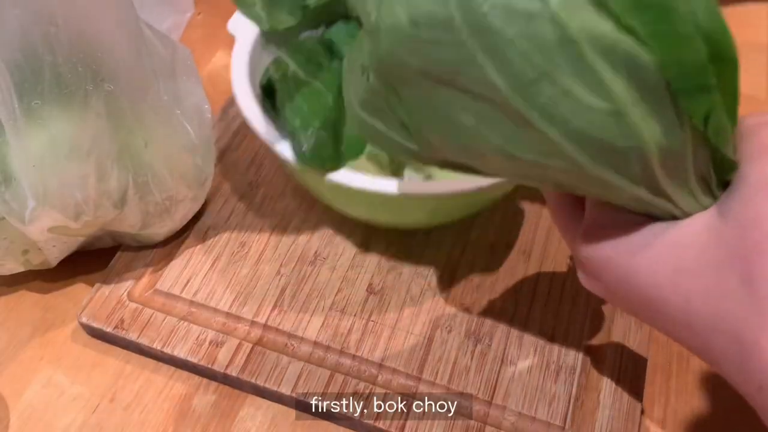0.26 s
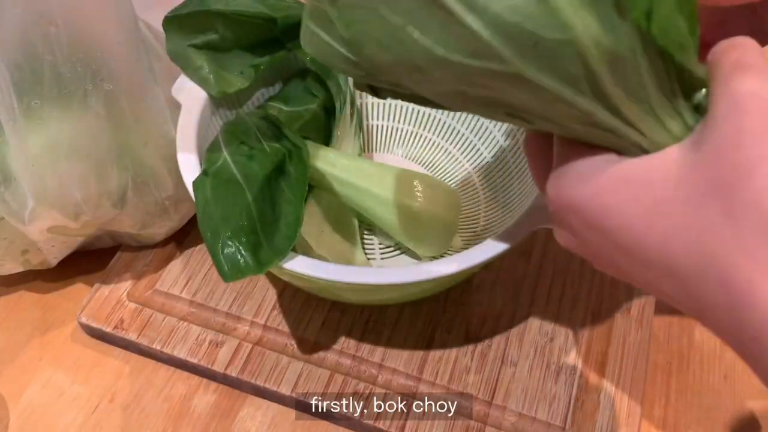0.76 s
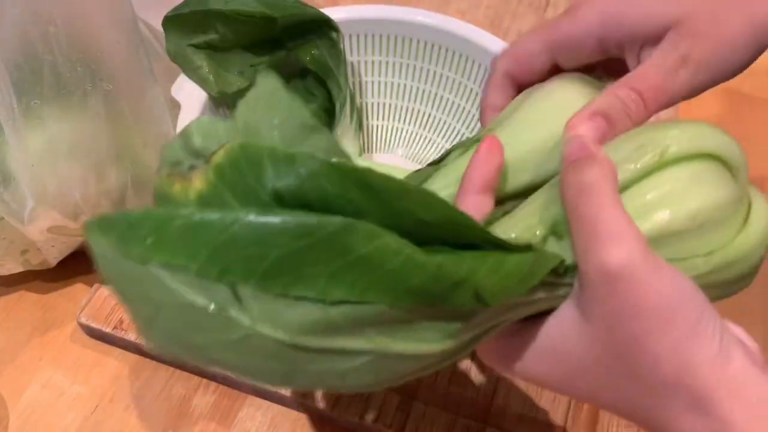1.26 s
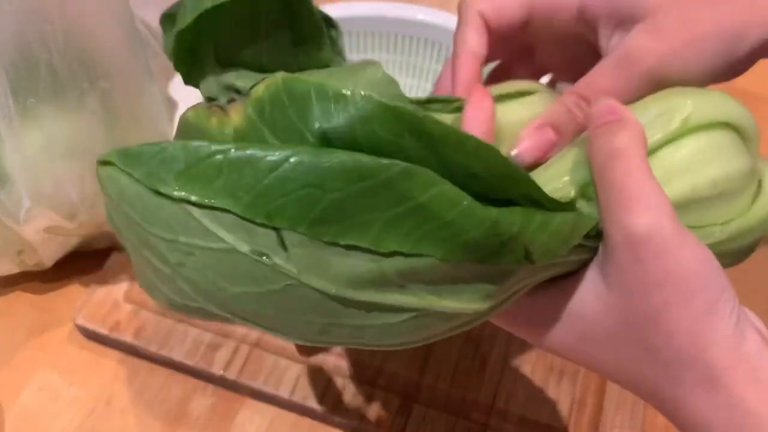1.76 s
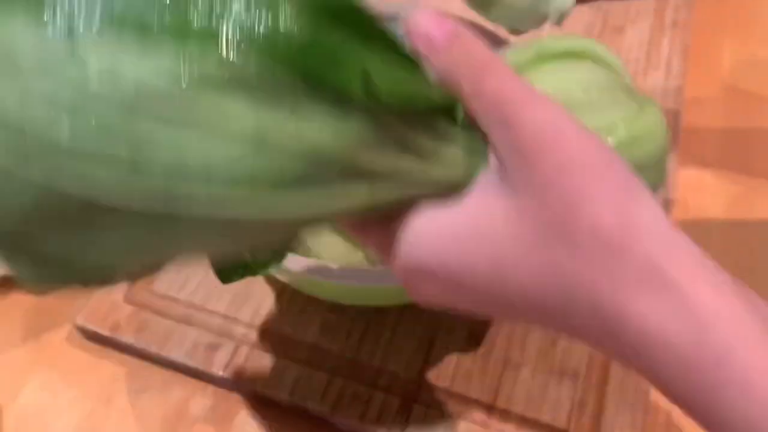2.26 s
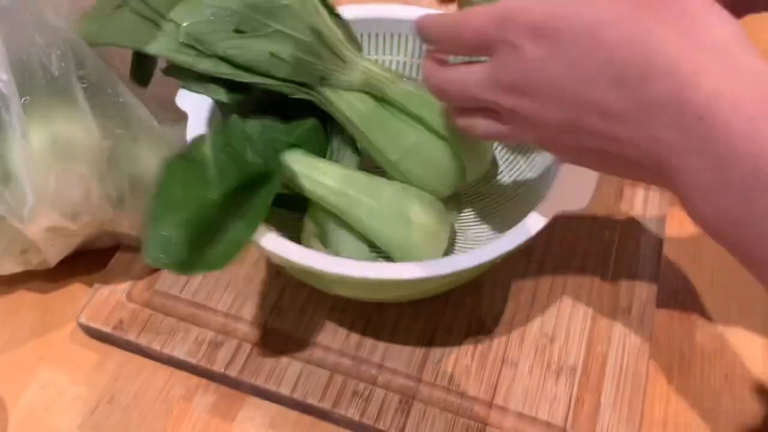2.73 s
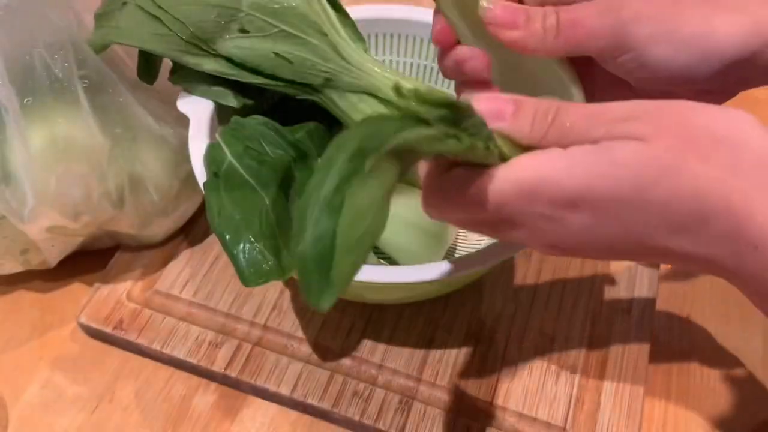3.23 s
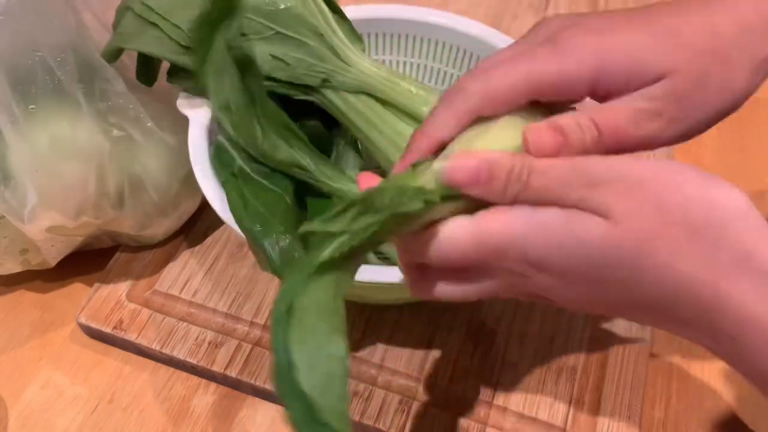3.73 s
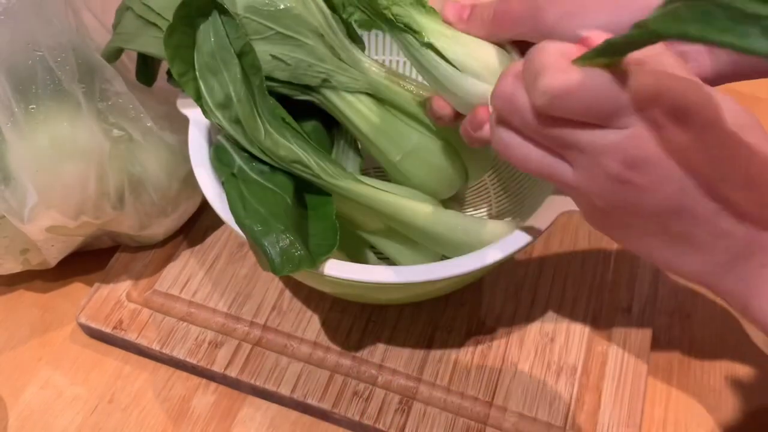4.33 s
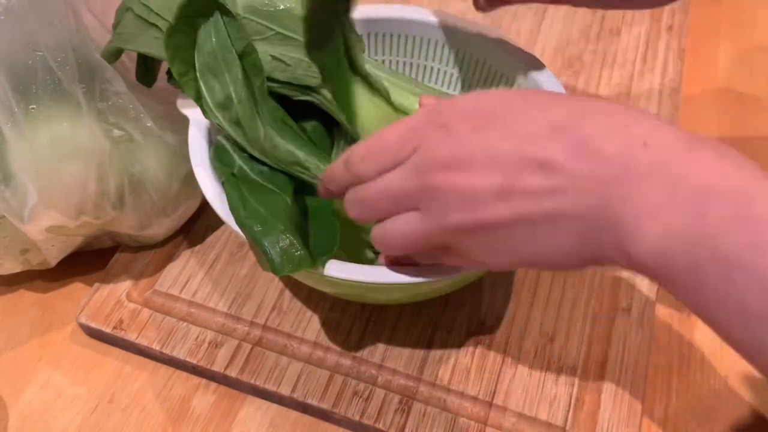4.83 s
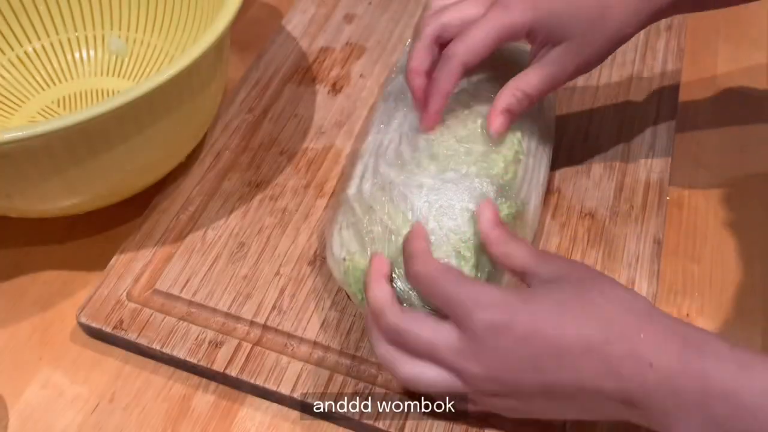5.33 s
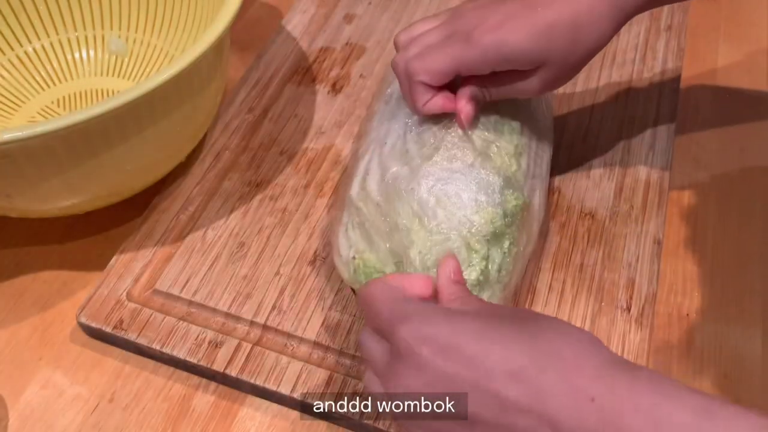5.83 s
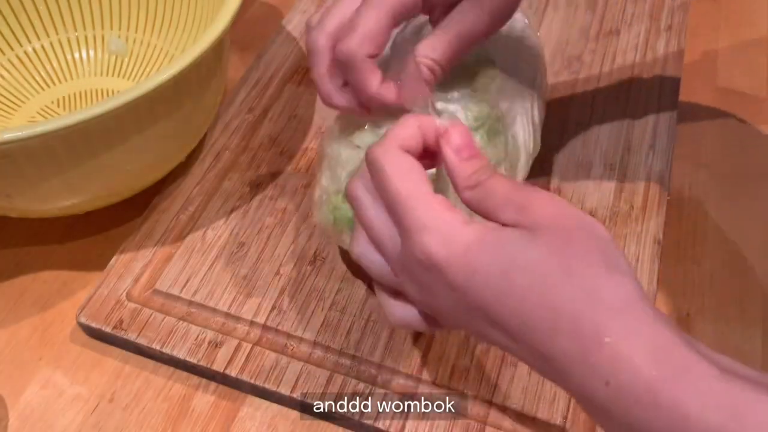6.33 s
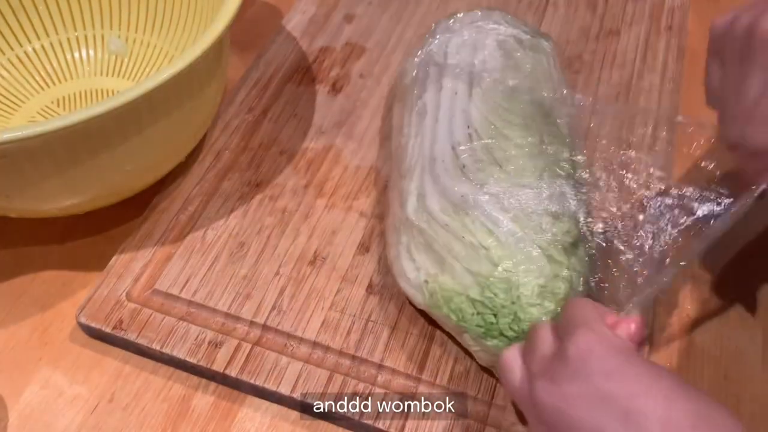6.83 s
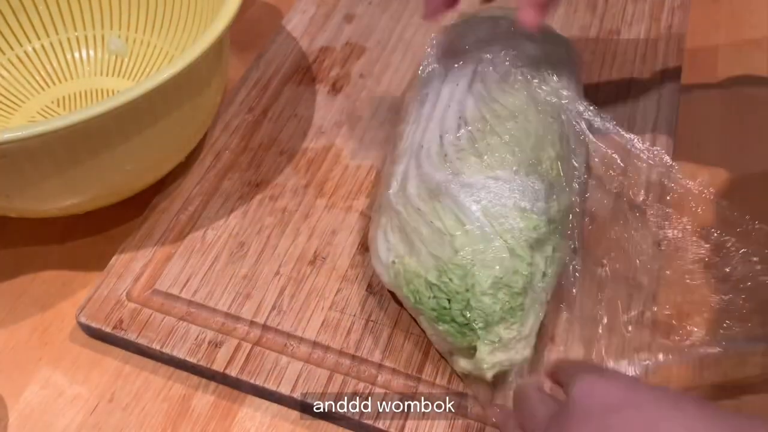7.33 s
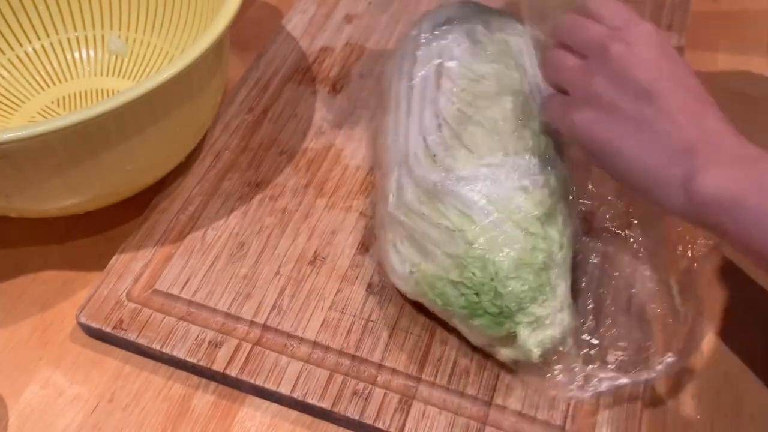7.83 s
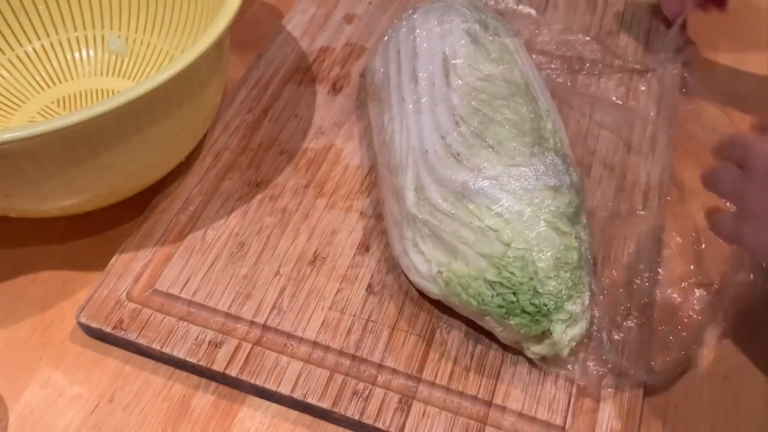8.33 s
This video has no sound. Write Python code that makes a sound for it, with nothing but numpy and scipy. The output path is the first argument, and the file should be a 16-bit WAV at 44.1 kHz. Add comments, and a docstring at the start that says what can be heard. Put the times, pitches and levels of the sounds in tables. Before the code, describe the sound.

Leaves rustle, a plastic colander knocks on a wooden board, juicy stalks snap sharply, then a cabbage thuds down and cling film crinkles and pops.

```python
"""Snapping stalks and peeling film

Bok choy is snapped by hand over a plastic colander on a wooden board, heard close up in a small kitchen.
The colander slides in, leaves rustle, board and colander knock, and stalks crack as bursts of decaying noise.
Then a cabbage lands on the board and its cling film is peeled off, crinkling and popping.
Rubbing is grainy noise under swelling strokes, knocks are decaying modes, and the room adds sparse reflections."""
import sys
import numpy as np
from scipy import signal
from scipy.fft import rfft, irfft, next_fast_len
from scipy.io import wavfile
from scipy.ndimage import uniform_filter1d

SR = 44100
rng = np.random.default_rng(int(sys.argv[2]) if len(sys.argv) > 2 else 0)


def transcribe(signal):
    """Save signal, clipped to [-1, 1], as a 16-bit WAV file at the path in sys.argv[1]."""
    frames = np.atleast_2d(signal).T
    limited = np.clip(frames, -1, 1)
    pcm = np.round(limited * 32767).astype(np.int16)
    wavfile.write(sys.argv[1], SR, pcm)


N = 378819
TIME = np.arange(N) / SR
HZ = np.fft.rfftfreq(4096, 1 / SR)


def amp(db):
    """Logarithmic level: converts decibels to an amplitude gain."""
    return 10 ** (np.asarray(db) / 20)


def evened(x):
    """Normalisation: scales a signal to a root-mean-square value of one."""
    return x / np.sqrt(np.mean(x ** 2) + 1e-20)


def read(points, hz=HZ):
    """Logarithmic pitch scale: interpolates a spectrum along log frequency."""
    point_hz, value = np.transpose(points)
    return np.interp(np.log(hz + 1), np.log(point_hz + 1), value)


# Swell and fade times each span this drop; a rounding above 1 lingers near full level, then falls faster.
STROKE_RANGE_DB, STROKE_ROUNDING = 19.5, 1.167


def follow(strokes, level_column=4):
    """Incoherent addition: strokes swell, hold and fade, and their powers sum to one gain over time."""
    power = np.zeros(N)
    for row in strokes:
        start_s, swell_s, hold_s, fade_s = row[:4]
        before = (start_s - TIME) / max(swell_s, .002)
        after = (TIME - start_s - hold_s) / max(fade_s, .002)
        away = np.maximum(before, after)
        near = away < 4
        drop_db = STROKE_RANGE_DB * np.maximum(away[near], 0) ** STROKE_ROUNDING
        power[near] += amp(row[level_column] - drop_db) ** 2
    return np.sqrt(power)


def add(mix, start_s, sound):
    """Superposition: adds a stereo sound to the mix from its start time."""
    part = mix[:, round(start_s * SR):][:, :sound.shape[1]]
    part += sound[:, :part.shape[1]]


def colour(x, db):
    """Minimum-phase filtering: a causal filter of the given dB shape that keeps the power of white noise."""
    mirrored_db = np.r_[db, db[-2:0:-1]]
    phase = -signal.hilbert(np.log(amp(mirrored_db))).imag[:len(db)]
    taps = irfft(amp(db) * np.exp(1j * phase))
    return signal.oaconvolve(x, taps[None] / np.linalg.norm(taps), axes=1)[:, :x.shape[1]]


def pair(count, alike):
    """Partial coherence: white noise for two ports, of which the fraction alike of the power is shared."""
    shared, left, right = rng.standard_normal((3, count))
    alike = np.clip(alike, 0, 1)
    return np.sqrt(alike) * shared + np.sqrt(1 - alike) * np.array([left, right])


def crackle(per_s, spread_db, clump_db, grain_size, alike):
    """Stick-slip: tiny slips of uneven size come in clumps, each a noise burst; overall power stays steady."""
    clumps = evened(uniform_filter1d(rng.standard_normal(N), size=350))
    size_db = spread_db * np.minimum(rng.exponential(1, N), 4.5) + clump_db * clumps
    slips = amp(size_db) ** 2 * (rng.random(N) < per_s / SR)
    keep = np.exp(-2 / (SR * grain_size * 0.0011))  # at size 1 the amplitude time constant is 1.1 ms
    power = signal.lfilter([1 - keep], [1, -keep], slips)
    local_power = abs(uniform_filter1d(power, size=3500)) + 1e-9
    return pair(N, alike) * np.sqrt(power / local_power)


def dappled(x, patchy_db):
    """Local resonance: each fold has its own colour, as brief random patches over time and frequency."""
    z = signal.stft(x, nperseg=256)[2]
    patches = rng.standard_normal(z.shape[1:])
    for axis in (0, 1):
        patches = uniform_filter1d(patches, size=5, axis=axis)
    return signal.istft(z * evened(amp(patchy_db * evened(patches))))[1][:, :N]


# Noise spectrum of the room's hush: frequency_hz, relative density_db (dB per Hz).
HUSH_SPECTRUM = [(20, -37), (50, -4), (120, 0.5), (220, -4.5), (320, -4), (500, -12.5), (1000, -20),
                 (2000, -21.5), (4000, -31.5), (9000, -32.5), (15000, -37.5)]


def hush(level_db=-65):
    """Stationary noise: the steady, shaped background of the room."""
    return amp(level_db) * colour(pair(N, alike=0.71), read(HUSH_SPECTRUM))


# Reverberation time of the kitchen: frequency_hz, t60_s.
ROOM_DECAY = [(100, 0.68), (500, 0.29), (1300, 0.28), (3500, 0.2548), (9000, 0.2), (15000, 0.2)]
# Strength of the reverberation: frequency_hz, level_db.
ROOM_LEVEL = [(60, -22), (200, -7.5), (600, -6.5), (2000, -4.5), (6000, -7), (15000, -10)]


def kitchen(x, first_s=.004):
    """Reverberation: sparse reflections of random sign differ at each port, and each band has its own decay."""
    count, step = 900, 22  # one reflection in every 22 samples
    taps = np.zeros((2, SR))
    at = round(first_s * SR) + step * np.arange(count) + rng.integers(0, step, (2, count))
    np.put_along_axis(taps, at, rng.choice([-1., 1.], at.shape), 1)
    hz, t, z = signal.stft(taps, SR, nperseg=256)
    t60 = read(ROOM_DECAY, hz)[:, None]
    unit = np.sqrt(2 * np.log(1000) * step / (SR * t60))  # compensates the energy for the decay time
    decay = amp(read(ROOM_LEVEL, hz)[:, None] - 60 * t / t60)
    tail = signal.istft(z * unit * decay, SR)[1]
    return signal.oaconvolve(x, tail[:, :SR // 2], axes=1)[:, :N]


# Vegetables shifting their weight on the board:
# start_s (at full level), swell_s, hold_s, fade_s, level_db (relative).
WEIGHT_SHIFTS = [(.09, 0.075, .005, 0.17, -40.5), (.39, 0.16, .01, 0.15, -47),
                 (.66, 0.028, 0.52, .2, -61.5), (1.275, 0.084, .01, .07, -55),
                 (1.63, 0.34, 0.008, 0.056, -58), (2.38, 0.7, 0.029, 0.075, -54),
                 (2.505, 0.041, .005, .03, -31.5), (2.6, .03, 0.19, .03, -44.5),
                 (3.68, 0.27, .01, 0.07, -42.5), (4.9, 0.086, 0.0089, 0.024, -45.5),
                 (5.3, 0.091, 0.56, 0.27, -65), (6.85, .1, 0.14, 0.84, -65)]
# Noise spectrum of the rumble: frequency_hz, relative density_db (dB per Hz).
RUMBLE_SPECTRUM = [(25, -24.5), (60, -5.5), (120, -2), (200, -3), (300, -8.5), (500, -17.5), (1200, -29.5),
                   (5000, -51)]


def rumble(level_db=-3.0, tug_db=-4):
    """Low-frequency excitation: the board rumbles as things shift or the film tugs at the cabbage."""
    shifting = follow(WEIGHT_SHIFTS) + amp(tug_db) * follow(FILM_PULLS, level_column=5)
    return amp(level_db) * shifting * colour(pair(N, alike=1.0), read(RUMBLE_SPECTRUM))


# The colander pushed over the board: start_s (at full level), swell_s, hold_s, fade_s, level_db (relative).
COLANDER_PUSHES = [(.088, 0.032, .04, .05, -52), (.16, .055, .18, 0.14, -42)]
# Noise spectrum of the scrape: frequency_hz, relative density_db (dB per Hz).
SCRAPE_SPECTRUM = [(40, -12.5), (120, -8), (220, 9.5), (450, -0.5), (750, -2), (1000, 3), (1300, 1.5),
                   (1700, -6.5), (2900, 2.5), (4000, -3), (6000, -2), (9000, -12), (15000, -14)]


def slide(level_db=2):
    """Friction noise: the foot of the colander scrapes over the grain of the wood."""
    grains = crackle(per_s=5100, spread_db=1.0, clump_db=0.5, grain_size=1.0, alike=0.43)
    scrape = colour(dappled(grains, patchy_db=3.0), read(SCRAPE_SPECTRUM))
    return amp(level_db) * follow(COLANDER_PUSHES) * scrape


# Noise spectrum of the clatter in a blow: frequency_hz, relative density_db (dB per Hz).
CLATTER_SPECTRUM = [(40, -14.5), (200, -7.5), (600, 7.5), (1200, -5.5), (1700, -10), (2700, -11),
                    (5000, -14.5), (9000, -20), (15000, -23.5)]


def strike(blows, modes, clatter_db, clatter_t60, tick_db):
    """Modal excitation: a blow rings modes and a dense clatter; longer contact leaves only the low ones."""
    t, out = np.arange(SR // 2) / SR, np.zeros((2, N))
    ring = np.zeros(len(t))
    for k, (hz, db, t60) in enumerate(modes):
        ring += (-1) ** k * amp(db - 60 * t / t60) * np.sin(2 * np.pi * hz * t)
    fade = amp(clatter_db - 60 * t / clatter_t60) + amp(tick_db - 60 * t / 0.011)
    for start_s, db, contact_ms in blows:
        sound = ring + colour(pair(len(t), alike=0.57) * fade, read(CLATTER_SPECTRUM))
        softness = signal.butter(2, 1000 / max(contact_ms, .06), fs=SR)
        add(out, start_s, amp(db) * signal.lfilter(*softness, sound))
    return out


# Blows on the board: start_s, level_db (relative), contact_ms (floored at 0.06).
BLOWS = [(2.521, -21.5, 2.05), (2.548, -18.5, 4.8), (2.737, -22, 4.8), (4.9247, -13.5, 0.051),
         (6.738, -29, 14.6)]
# Modes of the wooden board: pitch_hz, level_db (relative), t60_s.
BOARD_MODES = [(56, -8.5, .38), (98, -12, 0.23), (125.6, -2, .27), (163, -4, .18), (245, -12, .14),
               (309.5, -14, 0.11), (353, -12, .12), (516.6, -13, 0.16), (650, -17, .12), (759, -24, 0.12),
               (1075, -29, 0.089)]


def board():
    """Plate vibration: low modes of the wooden board give its thuds."""
    return strike(BLOWS, BOARD_MODES, clatter_db=-14.5, clatter_t60=0.14, tick_db=-10.0)


# Knocks of the colander on the board: start_s, level_db (relative), contact_ms (floored at 0.06).
KNOCKS = [(.071, -34, 3), (.091, -32.5, 2.26), (2.519, -30, 1.06), (2.7342, -9, 0.089), (2.7435, -15, 3.9),
          (2.767, -22.5, 4.2), (2.783, -25.5, 0.69), (3.598, -31.5, 6.5), (3.652, -33.5, 1.7),
          (3.684, -28.5, 6.9)]
# Modes of the plastic colander: pitch_hz, level_db (relative), t60_s.
COLANDER_MODES = [(139.5, -15.5, 0.34), (180, -20, 0.35), (231, -7.5, 0.17), (293.2, -2.5, 0.059),
                  (450, -16.5, 0.31), (554, -16, 0.12), (644, -19, .1), (716, 0, 0.013), (985, 1, 0.03),
                  (1121, -8, 0.097), (1277, -5, 0.019), (2560, -14.5, 0.042)]


def colander():
    """Shell vibration: mostly short-lived modes of the plastic bowl give its knocks."""
    return strike(KNOCKS, COLANDER_MODES, clatter_db=-12.5, clatter_t60=0.052, tick_db=1.5)


def rustle(strokes, grains, spectrum, crisp_db, body_db, split_hz=4500):
    """Two-band radiation: sharp creases give the treble of a rustle, broad rubbing gives its body."""
    sound = colour(grains, read(spectrum))
    high_pass = signal.butter(3, split_hz, "high", fs=SR, output="sos")
    low_pass = signal.butter(3, split_hz, "low", fs=SR, output="sos")
    crisp = evened(signal.sosfilt(high_pass, sound))
    body = evened(signal.sosfilt(low_pass, sound))
    treble = amp(crisp_db) * follow(strokes, level_column=4) * crisp
    return treble + amp(body_db) * follow(strokes, level_column=5) * body


# Leaves sweeping over each other and the colander:
# start_s (at full level), swell_s, hold_s, fade_s, crisp_db (relative treble), body_db (relative body).
LEAF_SWEEPS = [(1.064, 0.0067, 0.015, 0.016, -61.5, -64), (1.575, 0.059, 0.0067, 0.12, -61.5, -57.5),
               (1.955, 0.048, 0.028, 0.019, -59, -62.5), (2.21, 0.049, 0.11, 0.18, -51.5, -56.5),
               (2.382, 0.045, 0.043, .08, -40.5, -48), (2.462, 0.027, 0.12, 0.21, -36.5, -42),
               (2.868, 0.12, 0.012, 0.065, -50.5, -51), (3.222, 0.013, .008, .008, -50, -52.5),
               (3.485, 0.032, 0.0061, 0.078, -34.5, -45.5), (3.555, .04, 0.0077, 0.068, -37.5, -43),
               (3.65, 0.013, 0.0041, 0.067, -59, -54.5), (3.924, .016, .008, 0.085, -55.5, -59.5)]
# Fingers gripping and working along the stalks: the same columns and units as the sweeps.
FINGER_GRIPS = [(.67, 0.0087, .01, 0.048, -76, -59), (.87, 0.18, .04, 0.24, -82, -67),
                (1.26, 0.092, .02, 0.048, -76, -68.5), (1.432, 0.041, .05, 0.22, -73, -64),
                (2.13, .3, .02, 0.056, -87, -72.5), (3.03, 0.2, .02, 0.17, -63, -63.5),
                (4.025, 0.024, .015, 0.078, -67.5, -71), (4.2, 0.071, .005, 0.022, -68.5, -82),
                (4.345, .02, .1, 0.045, -64.5, -77.5), (4.465, .03, 0.035, 0.047, -57, -75),
                (4.984, 0.2, .01, 0.16, -65.5, -59)]
# Noise spectrum of leaves: frequency_hz, relative density_db (dB per Hz).
LEAF_SPECTRUM = [(80, -30), (300, -4.5), (1000, -0.5), (2000, -1.5), (4500, 1), (9000, 1.5), (14000, 2.5),
                 (17000, -5.5)]
# Noise spectrum of fingers: frequency_hz, relative density_db (dB per Hz).
TOUCH_SPECTRUM = [(80, -15), (400, -3.5), (1000, -1.5), (1700, 5), (2400, -4.5), (4500, -1), (9000, 5),
                  (14000, -2), (17000, -6)]


def leaves():
    """Granular friction: leaves sweep densely over each other; fingers give only sparse ticks."""
    sweeps = crackle(per_s=3200, spread_db=2.0, clump_db=2.5, grain_size=0.95, alike=.3)
    ticks = crackle(per_s=610, spread_db=0.0, clump_db=1.5, grain_size=1.0, alike=0.47)
    sweeps, ticks = dappled(sweeps, patchy_db=4.0), dappled(ticks, patchy_db=8.0)
    sweeping = rustle(LEAF_SWEEPS, sweeps, LEAF_SPECTRUM, crisp_db=3.0, body_db=1.0)
    return sweeping + rustle(FINGER_GRIPS, ticks, TOUCH_SPECTRUM, crisp_db=3.5, body_db=3)


# Noise spectrum of a crack: frequency_hz, relative density_db (dB per Hz).
CRACK_SPECTRUM = [(60, -19.5), (300, -13.5), (1000, -5), (2000, -3.5), (3500, 0), (6000, 5), (9000, 1.5),
                  (14000, 6), (17000, -16.5)]


def crack(length_ms, tilt_db, fizz_hz, fizz_db=5, fizz_width_hz=1600, rise_ms=0.34, ripple_db=2.5, alike=0.68):
    """Impulsive release: bursting cells or slipping film rise fast and decay briefly, with a treble peak."""
    ms = np.arange(4096) * 1000 / SR
    shape = np.exp(-ms / max(length_ms, .2)) * (1 - np.exp(-ms / rise_ms))
    burst = evened(pair(len(ms), alike) * shape) * np.sqrt(np.mean(shape ** 2))
    echo_s = rng.uniform(.0006, .0018)
    comb_db = ripple_db * np.cos(2 * np.pi * HZ * echo_s)  # a reflection off the hand or the bowl
    peak_db = fizz_db * np.exp(-((HZ - fizz_hz) / fizz_width_hz) ** 2)
    slope_db = tilt_db * np.log2(np.maximum(HZ, 500) / 500)
    return colour(burst, read(CRACK_SPECTRUM) + slope_db + peak_db + comb_db)


# Pulls that peel the film:
# start_s (at full level), swell_s, hold_s, fade_s, crisp_db (relative treble), body_db (relative body).
FILM_PULLS = [(5.26, .05, 0.22, 0.074, -62.5, -69), (5.497, 0.032, .005, 0.098, -49.5, -55),
              (5.56, 0.047, 0.081, .25, -56, -67), (5.62, 0.015, 0.0037, .045, -42, -50.5),
              (5.795, 0.13, .008, 0.079, -52, -56), (5.87, .1, 0.11, 0.11, -60, -64),
              (6.063, 0.038, 0.0044, 0.064, -50.5, -51.5), (6.22, 0.21, 0.079, 0.077, -42.5, -51),
              (6.337, .012, .004, 0.035, -40.5, -49.5), (6.504, .12, 0.021, 0.13, -37.5, -47.5),
              (6.757, .13, 0.014, 0.11, -42.5, -47.5), (6.9, 0.12, 0.022, 0.48, -45, -52.5),
              (7.032, .012, 0.042, 0.065, -43, -57), (7.19, 0.12, 0.021, 0.12, -46.5, -55),
              (7.352, .06, 0.0054, 0.021, -52, -59), (7.47, .02, 0.042, .05, -56.5, -66.5),
              (7.53, 0.036, 0.13, .2, -50, -60.5), (7.772, .19, 0.12, 0.027, -43, -50),
              (7.978, 0.096, 0.0077, 0.1, -48, -53.5), (8.15, 0.043, 0.0026, 0.021, -39, -52.5),
              (8.188, .03, 0.0065, 0.031, -37, -42.5), (8.22, 0.14, 0.051, 0.18, -53, -56.5),
              (8.33, .1, 0.082, 0.071, -66.5, -61.5), (8.544, 0.15, .01, .2, -61, -61)]
# Cling film letting go: start_s, level_db (relative), length_ms (decay time constant), tilt_db (per octave).
FILM_POPS = [(5.449, -35.5, 4.9, -4), (5.498, -31, 5.3, -10.5), (5.575, -31.5, 3.5, -4),
             (5.6235, -20, 2.7, -2.5), (5.6984, -27.5, 2.4, 5), (5.7968, -40, 3.7, 2), (5.881, -33, 3.8, 2),
             (6.0372, -38.5, 2.7, -2.5), (6.0614, -39, 1.8, -2), (6.339, -23.5, 1.14, -9),
             (6.51, -26.5, 4.9, -2.5), (6.5413, -21.5, 4.5, -1), (6.7366, -23, 5.2, 15),
             (6.8338, -25.5, 4.3, -0.5), (6.8989, -21.5, 3.4, -3.5), (6.949, -23.5, 4.7, -3.5),
             (7.0319, -21, 3.7, 2), (7.197, -16, 0.68, 7), (7.201, -16, .9, 11), (7.5649, -30, 2.9, 4),
             (7.7752, -23, 2.6, -2), (7.865, -32, 3.5, 5), (7.9747, -26.5, 2.2, -2), (8.1497, -27, 2.4, 9),
             (8.1896, -19.5, 4.4, 4), (8.546, -34, 2.9, -4)]
# Noise spectrum of the film: frequency_hz, relative density_db (dB per Hz).
FILM_SPECTRUM = [(80, -11.5), (300, 5.5), (1000, 0.5), (2200, 4), (4500, -1.5), (9000, -2), (14000, 0),
                 (17000, -6)]


def film(pop_db=-7, crease_db=-9):
    """Adhesion release: film unsticks in a fine crinkle with sharp creases, and pops as a fold lets go."""
    grains = crackle(per_s=3000, spread_db=0.5, clump_db=1.5, grain_size=0.72, alike=0.29)
    creases = crackle(per_s=140, spread_db=3.5, clump_db=1.0, grain_size=0.71, alike=0.76)
    crinkle = dappled(grains, patchy_db=3.5) + amp(crease_db) * creases
    out = rustle(FILM_PULLS, crinkle, FILM_SPECTRUM, crisp_db=3.0, body_db=1.5)
    for start_s, db, length_ms, tilt_db in FILM_POPS:
        fizz_hz = rng.uniform(8500, 14500)  # the treble peak wanders at random from pop to pop
        add(out, start_s, amp(db + pop_db) * crack(length_ms, tilt_db, fizz_hz))
    return out


def snap(length_ms, stalk_hz, ring_db, tilt_db, fizz_hz, width_hz=400):
    """Resonance: a crack together with the brief ring that it starts in the juicy stalk."""
    burst = crack(length_ms, tilt_db, fizz_hz)
    ring = signal.lfilter(*signal.iirpeak(stalk_hz, stalk_hz / width_hz, SR), burst)
    return burst + amp(ring_db) * evened(ring) * burst.std()


def recoil(top_hz=900, rise_ms=2.4, decay_ms=7):
    """Momentum transfer: the dull jolt of the broken stalk in the hands."""
    ms = np.arange(4096) * 1000 / SR
    jolt = evened(signal.lfilter(*signal.butter(2, top_hz, fs=SR), pair(len(ms), alike=0.64)))
    return jolt * np.exp(-ms / decay_ms) * (1 - np.exp(-ms / rise_ms))


# Stalks breaking: start_s, level_db (relative), length_ms (decay time constant),
# ring_db (relative to the crack), tilt_db (per octave).
STALK_BREAKS = [(3.0382, -36, 1.6, 1.5, -2.5), (3.2459, -9.5, 1.2, -17.5, 1.5),
                (3.2682, -5, 1.42, -24, -1.1), (3.2702, -15, 1.2, -0.5, -4), (3.2945, -23, 2.1, -12.5, 10),
                (3.305, -19.5, 1.5, -9, 4), (3.7646, -50.5, 1.4, 10, -2.5), (4.0778, -39.5, 1.3, -1.5, 14),
                (4.211, -16, 1.46, -22.5, 2), (4.2224, -27.5, 2.2, -15, 0),
                (4.237, -4.5, 0.92, -10.5, -0.06), (4.256, -28.5, 1.5, -7, -4),
                (4.2729, -24.5, 1.8, -11.5, 7.5), (4.2828, -29, 1.5, -7, 1),
                (4.3892, -32.5, 1.7, -12.5, 12), (4.4530, -39, 2.9, -13, 8.5), (4.474, -35, 2.1, -12, 8.5),
                (4.523, -30, 3.2, -15, -2.5), (4.5254, -19.5, 1, -1.5, 3)]
# Leaves and fingers flicking: start_s, level_db (relative), pitch_hz (stalk resonance),
# ring_db (relative to the crack), tilt_db (per octave).
HANDLING_FLICKS = [(0.653, -31, 1600, -11, -2), (0.783, -41, 1720, -15, -7.5), (0.808, -43.5, 1280, -5, 2),
                   (0.884, -42.5, 1620, -20, -5.5), (1.002, -42, 926, 2, -4),
                   (1.258, -40.5, 883, -18, -2.5), (1.337, -41.5, 856, -12, -2), (1.408, -49, 1840, -11, 0),
                   (1.425, -44.5, 1490, -20, -1), (1.487, -35, 1080, -15, -7),
                   (1.919, -39.5, 1030, -3, 2.5), (1.933, -42, 960, 8, -1.5), (1.992, -38.5, 1610, -7, 3),
                   (2.02, -44, 966, -12, -1), (2.067, -45.5, 905, 0.5, 6), (2.21, -32.5, 1540, -18, -2),
                   (2.272, -28, 1390, -16, 3), (2.377, -30, 1120, -8, 2), (2.873, -34, 850, -16, -2),
                   (3.455, -30, 1530, -8, 0.5), (3.484, -22.5, 883, -18, 2), (3.592, -25, 1250, -7.5, 0.5)]
# The stalk being broken: start_s, pitch_hz (resonance), fizz_hz (treble peak of its bursting cells).
STALKS_IN_HAND = [(2.95, 1670, 9000), (4.0, 2280, 13900), (4.5, 1983, 14200)]


def stalks(snap_db=1, flick_db=-4, recoil_db=-28):
    """Brittle fracture: loud breaks coloured by the stalk in hand, and the small flicks of handling."""
    out = np.zeros((2, N))
    for start_s, db, length_ms, ring_db, tilt_db in STALK_BREAKS:
        _, stalk_hz, fizz_hz = [stalk for stalk in STALKS_IN_HAND if stalk[0] <= start_s][-1]
        fracture = amp(db + snap_db) * snap(length_ms, stalk_hz, ring_db, tilt_db, fizz_hz)
        add(out, start_s, fracture + amp(db + recoil_db) * recoil())
    for start_s, db, stalk_hz, ring_db, tilt_db in HANDLING_FLICKS:
        flick = snap(2.03, stalk_hz, ring_db, tilt_db, fizz_hz=9100)  # decay time constant in ms
        add(out, start_s, amp(db + flick_db) * flick)
    return out


def scene():
    """Direct and reverberant field: everything on the board, its reflections and the hush of the room."""
    near = rumble() + slide() + board() + colander() + leaves() + film() + stalks()
    return hush() + kitchen(near) + near


# Response of the microphone pair: frequency_hz, response_db (relative).
MIC_RESPONSE = [(15, -21.5), (28, -15), (40, -3.5), (56, 1.5), (6000, 0), (7200, -4.5), (8200, 2),
                (9600, 3.5), (10700, 0), (11200, -11.5), (11700, -23), (12400, 1), (13500, -2), (14700, 2),
                (15600, -8.5), (16300, -26)]
# Lag of the left port: frequency_hz, phase_rad.
LEFT_LAG = [(60, .1), (140, 0.5), (290, .7), (520, 3.42), (1130, 5.6), (2200, 5.1), (4500, 4.32),
            (8500, 0.75), (14000, 1)]
# Left minus right level: frequency_hz, difference_db.
LEFT_MINUS_RIGHT = [(60, 0), (140, -1.5), (280, -3), (500, -1), (1100, 0.5), (2300, 0), (4500, -3.5),
                    (9000, 0.5)]


def record(dry, level_db=-2, edge_hz=16500):
    """Transduction: two ports differ in phase and level and share a treble notch; then the band is limited."""
    size = next_fast_len(N + 4096)
    hz = np.fft.rfftfreq(size, 1 / SR)
    half_db = read(LEFT_MINUS_RIGHT, hz) / 2
    left = amp(half_db) * np.exp(-1j * read(LEFT_LAG, hz))
    ports = np.array([left, amp(-half_db)])
    at_ports = irfft(rfft(dry, size) * ports, size)[:, :N]
    heard = amp(level_db) * colour(at_ports, read(MIC_RESPONSE))
    band_limit = signal.firwin(255, edge_hz, window=("kaiser", 9), fs=SR)
    return signal.oaconvolve(heard, band_limit[None], "same")


dry = scene()
out = record(dry)
transcribe(out)
```